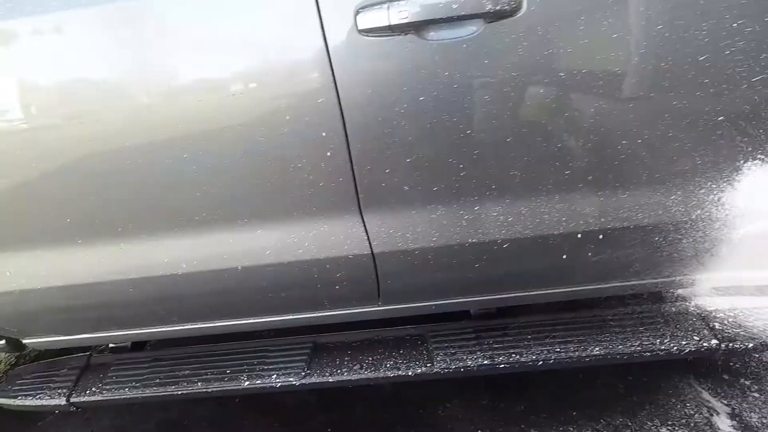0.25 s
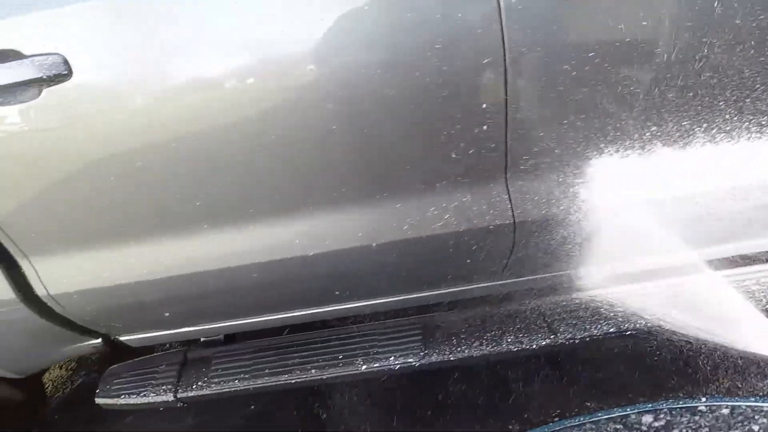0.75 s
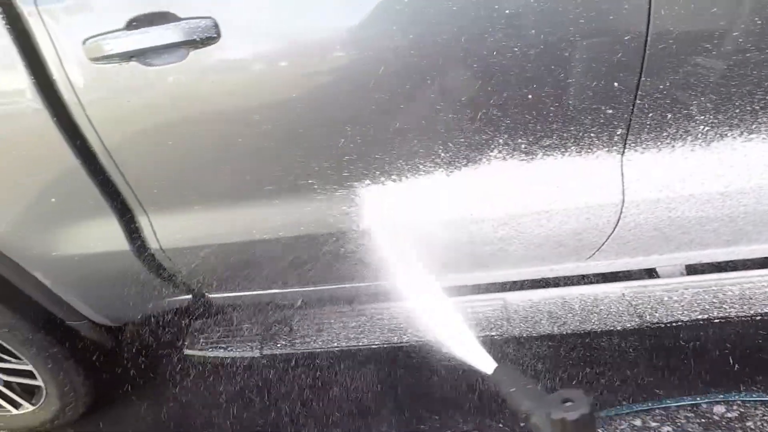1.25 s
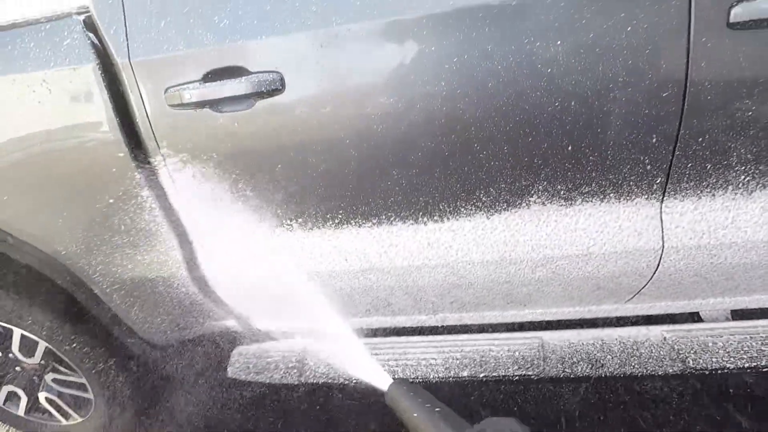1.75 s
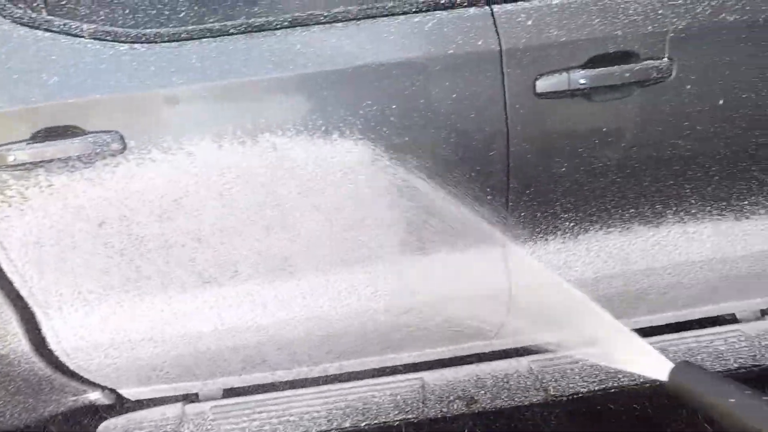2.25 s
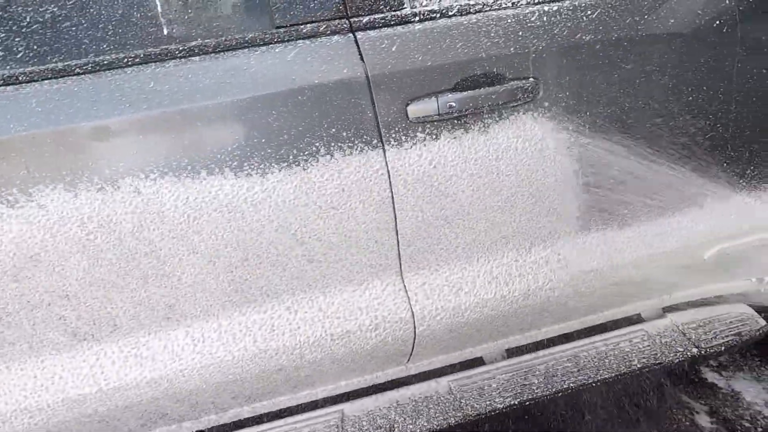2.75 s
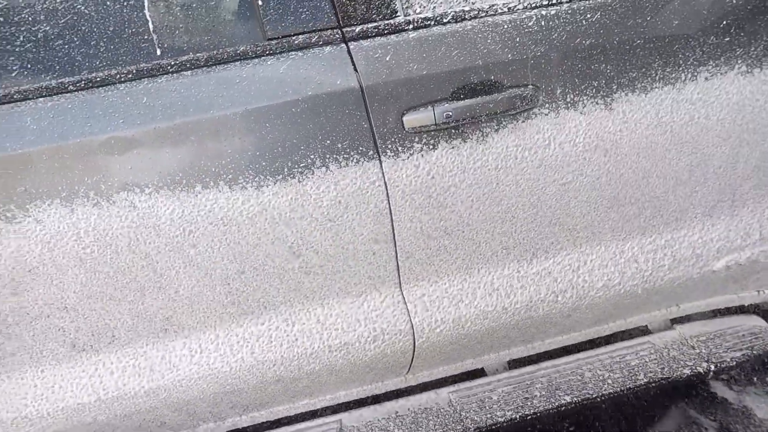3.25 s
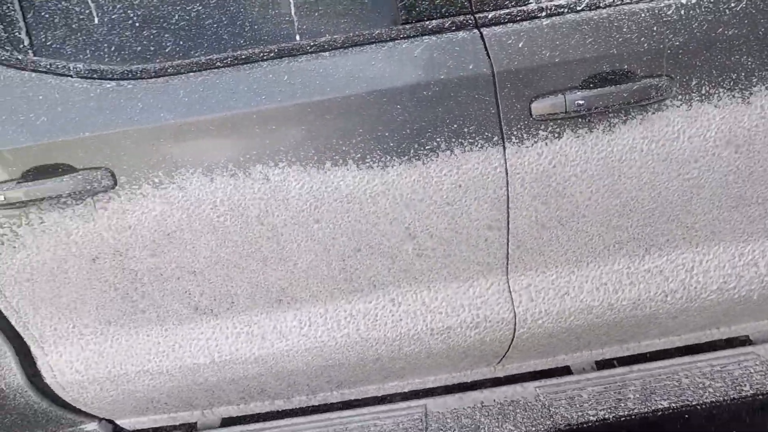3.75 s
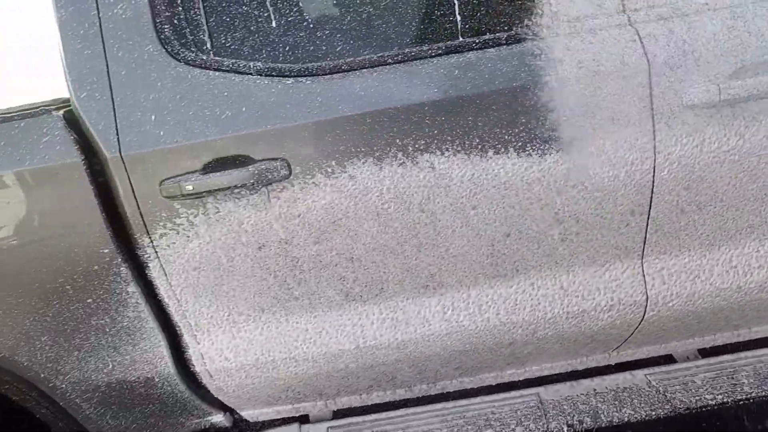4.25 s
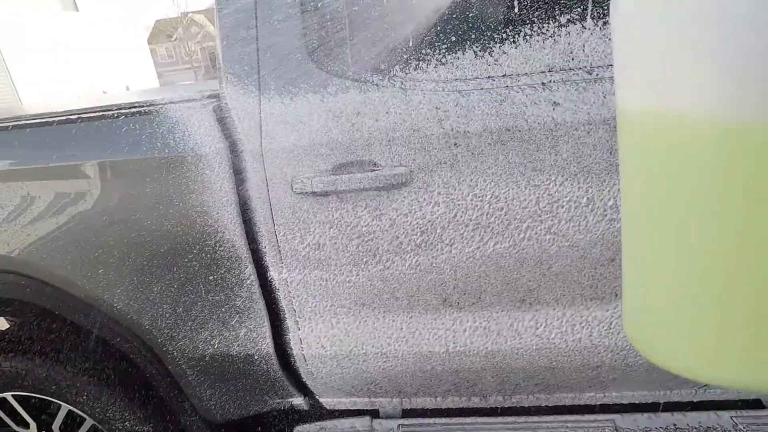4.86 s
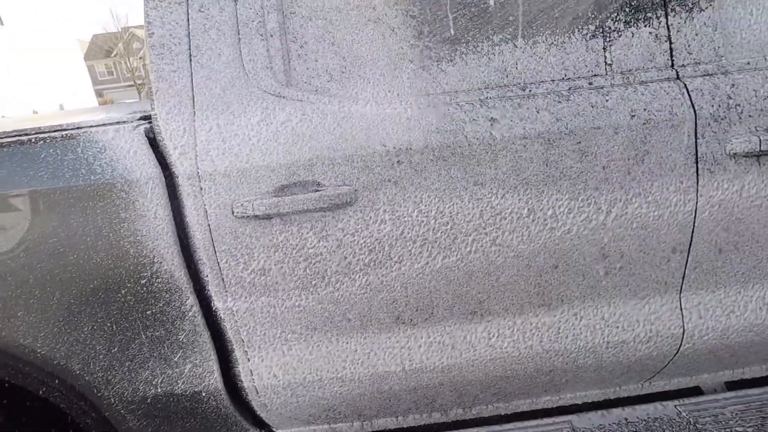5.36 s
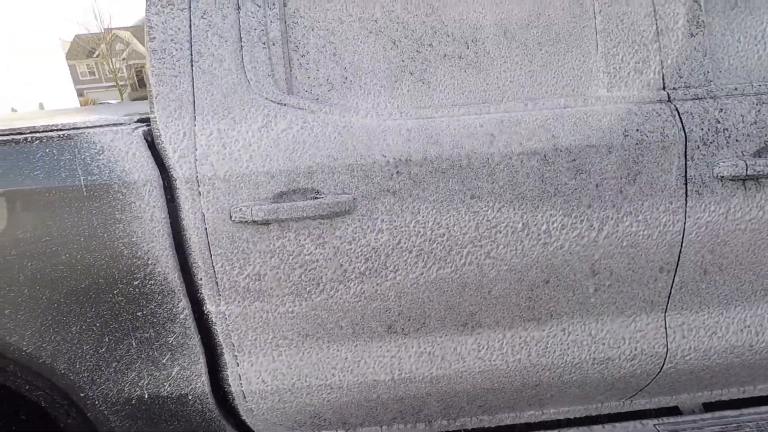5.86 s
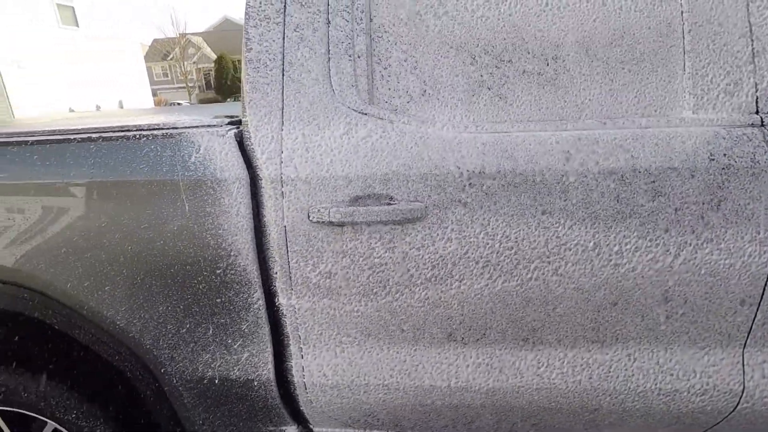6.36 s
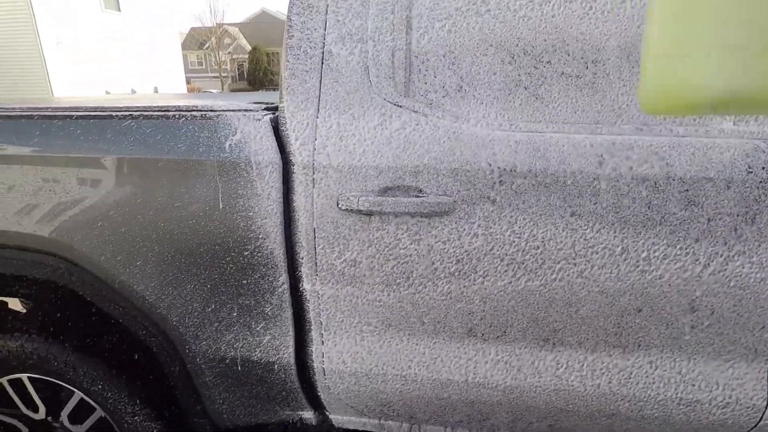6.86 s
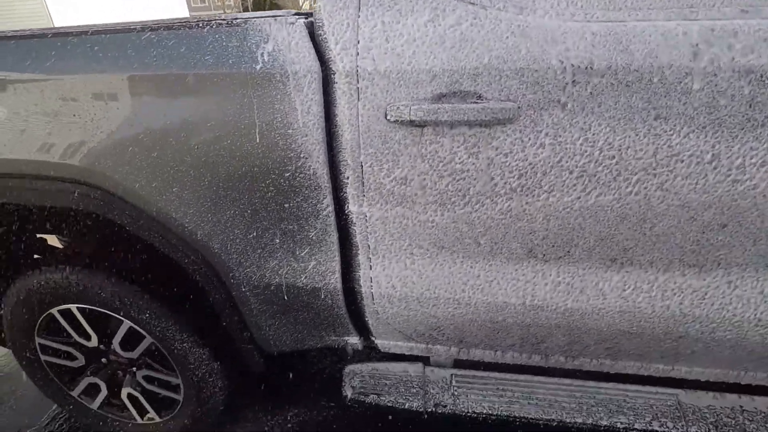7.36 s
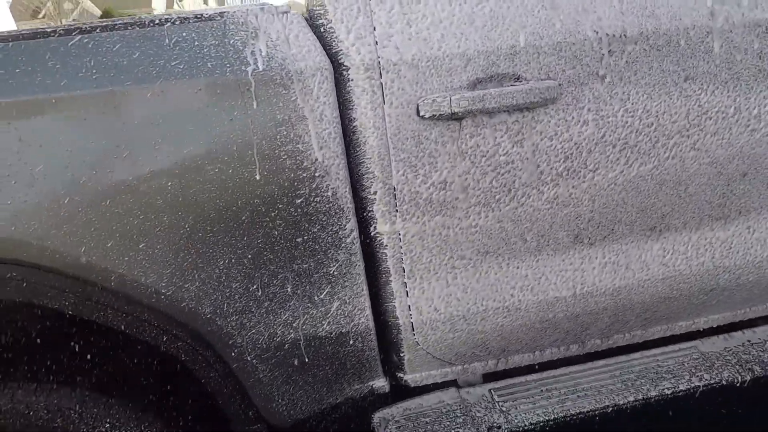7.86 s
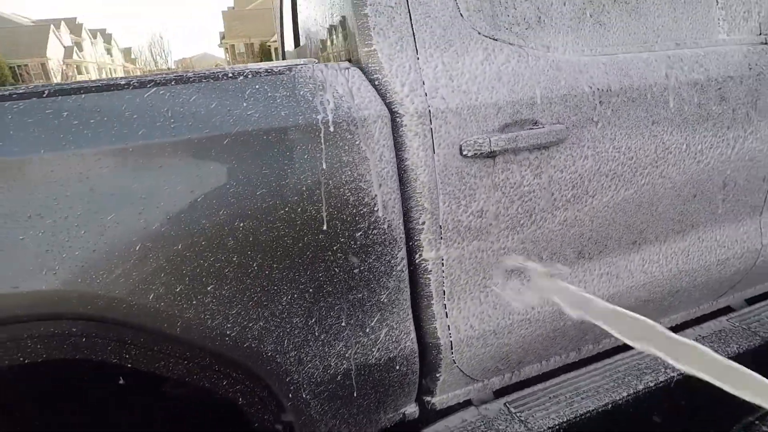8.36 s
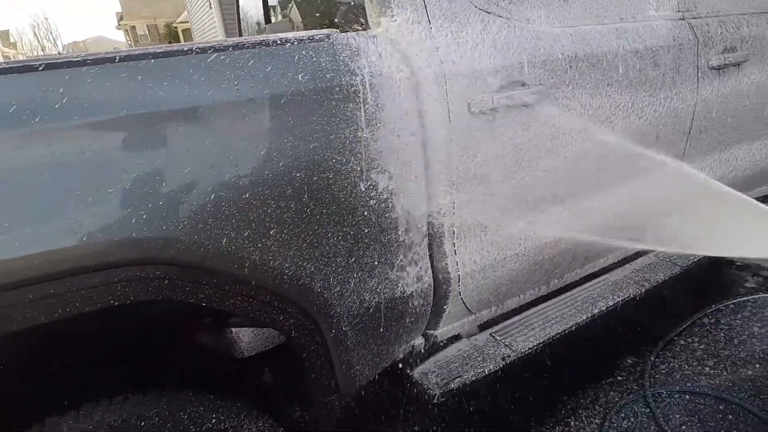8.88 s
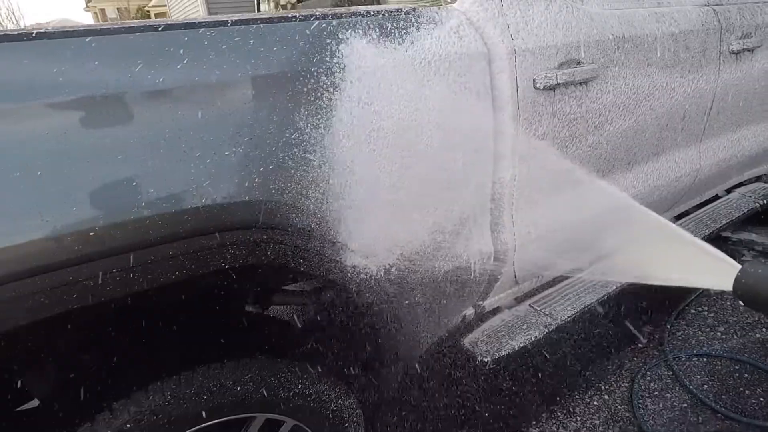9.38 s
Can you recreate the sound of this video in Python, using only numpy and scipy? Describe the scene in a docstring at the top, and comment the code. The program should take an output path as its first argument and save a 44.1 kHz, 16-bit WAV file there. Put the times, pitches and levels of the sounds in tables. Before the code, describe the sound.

Close pressurised spray with a ringing nozzle hiss, trigger clacks and motor run-down, bumps and wind rumble, then the spray bursts back.

```python
"""A foam lance on an electric pressure washer sprays a car door, close to a mono action camera in gusty air.
First a motor whines down; at 0.25 s the jet and the motor under power are on: noise bands, sliding tones.
A low hum of two sines comes and goes, and the sound drops out twice for an instant, near 0.2 and 4.8 s.
At 6.5 s the trigger snaps shut: decaying cracks and knocks over a falling whine, then thumps on the camera.
At 8.3 s the trigger opens again, the motor spins up and the jet returns. Gusts of low noise run throughout."""
import sys
import numpy as np
from scipy import signal
from scipy.fft import rfft, irfft, next_fast_len
from scipy.io import wavfile
from scipy.ndimage import uniform_filter1d, map_coordinates

SR = 44100
rng = np.random.default_rng(int(sys.argv[2]) if len(sys.argv) > 2 else 0)


def unload_wav(signal):
    """Save mono or channel-first audio to the path in sys.argv[1] as 16-bit WAV at rate SR, clipped to [-1, 1]."""
    wavfile.write(
        sys.argv[1],
        SR,
        np.round(np.clip(np.atleast_2d(signal).T, -1, 1) * 32767).astype(np.int16),
    )


N = 424241  # samples
FULL_HZ = 3267  # commutator bar rate at full speed
TOP_HZ = 15400  # upper band limit


def amp(db):
    """Decibels to a linear factor."""
    return 10 ** (np.asarray(db) / 20)


def unit(x):
    """x scaled to rms 1."""
    return x / np.sqrt(np.mean(x ** 2) + 1e-20)


def along(points, hz):
    """Read rows of (Hz, value) at hz, along a log frequency axis."""
    f, values = np.transpose(points)
    return np.interp(np.log(hz + 1), np.log(f + 1), values)


def curves(rows):
    """One value per sample for each column after the time."""
    s, *columns = np.transpose(rows)
    t = np.arange(N) / SR
    return [np.interp(t, s, column) for column in columns]


def spans(tables, fade):
    """A gate that is open inside the tables, with edges of fade seconds, and their columns as curves."""
    t = np.arange(N) / SR
    is_open = sum((t > rows[0][0] - .002) & (t < rows[-1][0] + .014) for rows in tables) > 0
    gate = uniform_filter1d(is_open * 1., max(round(fade * SR), 1))
    return gate, curves(np.vstack(tables))


def wobble(rate):
    """A smooth random curve, rate knots a second."""
    coarse = np.arange(0, N + 32, 32)  # every 32nd sample is enough
    knots = rng.standard_normal(int(N * rate / SR) + 4)
    smooth = map_coordinates(knots, [coarse * rate / SR], mode="nearest")
    return np.interp(np.arange(N), coarse, smooth)


def filtered(x, response):
    """x times a response of frequency."""
    m = next_fast_len(N + SR // 2)
    spectrum = rfft(x, m) * response(np.fft.rfftfreq(m, 1 / SR))
    return irfft(spectrum, m)[..., :N]


def coloured(x, spectrum):
    """x shaped by rows of (Hz, dB), at rms 1."""
    return unit(filtered(x, lambda hz: amp(along(spectrum, hz))))


def rush(spectrum, patchy_db, streaky_db):
    """Coloured noise of rms 1 with short random patches, and streaks as of echoes off car and ground."""
    z = signal.stft(rng.standard_normal(N), nperseg=512)[2]

    def field(bins, frames):
        across = uniform_filter1d(rng.standard_normal(z.shape), bins, 0)
        return unit(uniform_filter1d(across, frames, 1))

    gain = amp(patchy_db * field(6, 14) + streaky_db * field(4, 110))
    noise = signal.istft(z * gain, nperseg=512)[1][:N]
    return coloured(noise, spectrum)


def narrow(hz, width_hz):
    """Noise in a resonance whose centre follows hz; width_hz holds at the highest pitch and shrinks with it."""
    pair = filtered(rng.standard_normal((2, N)), lambda f: 1 / (1 + (2 * f / width_hz) ** 2))
    cycles = np.cumsum(hz)
    a, b = pair[:, np.minimum(cycles / hz.max(), N - 1).astype(int)]
    turn = 2 * np.pi * cycles / SR
    return unit(a * np.cos(turn) + b * np.sin(turn))


def wavering(hz, drift):
    """A tone whose phase (drift in radians) and level drift."""
    turn = 2 * np.pi * np.cumsum(hz) / SR + drift * wobble(12)
    return np.sqrt(2) * amp(2.3 * wobble(5)) * np.sin(turn)


def wind():
    """Slow pressure swings on the microphone port, quicker lumps and a dull roar."""
    # Each row: time in seconds, gust in dB, roar in dB; both are offset in the mix below.
    gusts = [(0, -1, -57), (.7, -1, -42), (1.5, 2.5, -51), (2.2, 0, -57), (3.2, -2.5, -38.5),
             (4.15, -0.5, -38.5), (4.7, 2.5, -61), (5.6, -3, -62), (6.5, -1, -52), (7.5, 3, -37.5),
             (8.4, 4, -47), (8.85, -3, -56), (9.3, 6, -50), (9.62, 1, -45)]
    # Colours of the three layers. Each row: frequency in Hz, relative level in dB.
    buffet_colour = [(1, -39), (4, 5.5), (12, 5.5), (20, -6.5), (30, -49), (45, -73)]
    flutter_colour = [(12, -34), (22, -10.5), (45, 3), (80, -10.5), (160, -28), (300, -35), (500, -120)]
    roar_colour = [(70, -41), (130, -3), (230, 5.5), (330, 5), (500, -42)]
    gust_db, roar_db = curves(gusts)
    colours = (buffet_colour, flutter_colour, roar_colour)
    slow, lumps, roar = [coloured(rng.standard_normal(N), colour) for colour in colours]
    lumpy = amp(3.3 * wobble(12.0))
    out = amp(-14.5 + gust_db) * slow
    out += amp(-42 + 1.26 * gust_db) * lumpy * lumps  # the flutter grows faster than the gust
    return out + amp(roar_db - 5) * lumpy * roar


def hum():
    """A low tone and its octave, swelling now and then."""
    # Each row: start in seconds, end in seconds, first level in dB rms, last level in dB rms,
    # octave in dB over the tone.
    swells = [(2.102, 3.7, -44.5, -45, -15), (3.7, 4.601, -36.5, -38, -9), (5.85, 7.89, -44.5, -40, -2)]
    t = np.arange(N) / SR
    turn = 2 * np.pi * np.cumsum(58.1 + .8 * wobble(3.2)) / SR  # centre and drift in Hz
    out = np.zeros(N)
    for start, end, first_db, last_db, octave_db in swells:
        gate = np.clip(np.minimum(t - start, end - t) / 0.092 + .5, 0, 1)
        level = amp(np.interp(t, [start, end], [first_db, last_db]))
        out += gate * level * (np.sin(turn) + amp(octave_db) * np.sin(2 * turn))
    return np.sqrt(2) * out


def taps():
    """Taps on the camera mount: one low push, then the mount rings."""
    # Each row: start in seconds, ring in dB, thump in dB; each is raised by a fixed amount below.
    mount_taps = [(6.826, -27, -22.5), (7.271, -20, -20.5), (7.91, -14, -27), (7.996, -26, -25),
                  (8.11, -18, -26), (8.199, -42, -32), (8.621, -21, -34), (9.127, -33, -26.5)]
    out, t = np.zeros(N + SR), np.arange(SR // 4) / SR
    push = np.exp(-((t - .004) / 0.0039) ** 2) * -np.cos(2 * np.pi * 90 * (t - .004))
    ring = amp(-60 * t / .16) * (1 - np.exp(-t / 0.0065)) * np.sin(2 * np.pi * 226 * t)
    for s, ring_db, thump_db in mount_taps:
        out[round(s * SR):][:len(t)] += amp(ring_db + 3) * ring + amp(thump_db + 9.5) * push
    return out[:N]


def clicks():
    """Plastic contacts of trigger and grip: a scratchy crack around one pitch and a hollow knock."""
    # Each row: start in seconds, crack in dB (relative), crack pitch in Hz, crack's 60 dB decay in seconds,
    # knock in dB (relative), knock pitch in Hz.
    contacts = [(6.517, 5, 5500, 0.014, -9, 720), (6.522, 7, 4070, 0.027, -4.5, 727),
                (6.566, -22, 3520, .02, -22, 740), (7.08, -29, 1460, .06, -20, 1000),
                (7.142, -19, 7450, 0.036, -50, 894), (7.62, -25, 3320, 0.034, -50, 900),
                (7.67, -26, 7050, 0.051, -47, 900), (7.78, -30, 3070, 0.14, -22, 580),
                (7.879, -29, 4020, 0.27, -21, 1020), (7.909, -28, 6020, 0.056, -21, 990),
                (8.2858, -12, 6000, 0.014, -25, 476), (8.288, -16, 1980, 0.024, -2, 494),
                (8.296, -7, 7090, .015, -25, 501), (8.312, -20, 8900, .012, -21, 503),
                (8.33, -14, 3020, .02, -13, 506), (8.348, -24, 5060, .015, -23, 480),
                (8.408, -9, 5000, .015, -35, 600), (8.413, -4.5, 3500, 0.023, -32, 600),
                (8.42, -4, 3880, 0.026, -30, 600)]
    out, t = np.zeros(N + SR), np.arange(SR // 8) / SR
    for s, crack_db, crack_hz, t60, knock_db, knock_hz in contacts:
        scratch = rng.standard_normal((2, len(t)))
        crack = 1.76 * uniform_filter1d(scratch[0], size=12) * np.sin(2 * np.pi * crack_hz * t)
        crack += 0.17 * uniform_filter1d(scratch[1], size=2)  # bright, unpitched grit
        crack *= amp(crack_db - 60 * t / t60) * (1 - np.exp(-t / t60 / 0.022))
        knock = amp(knock_db - 60 * t / 0.027) * (1 - np.exp(-t / 0.0018))
        knock *= np.sin(2 * np.pi * knock_hz * t)
        out[round(s * SR):][:len(t)] += crack + knock
    return out[:N]


def motion():
    """Bar rate, whine and overtone levels, time since switch-off, gate while coasting, low fan level."""
    # Each row: coasting heard from, to, and the switch-off, all in seconds.
    stops = [(0, .246, -.49), (6.56, 8.287, 6.56)]
    # Low fan noise at each switch-off, in dB.
    fan_low_db = [-42.5, -37.5]
    # One run-down. Each row: seconds after switch-off, bar rate in Hz, whine in dB, overtones in dB over it.
    run_down = [(0, 3281, -50, 12), (.1, 3085, -40, -3), (.17, 2676, -48, -3), (.24, 2233, -40.5, 3),
                (.39, 1961, -43, 3.5), (.47, 1510, -35.5, -7), (.58, 1196, -46.5, 8), (.69, 950, -39, -1),
                (.8, 718, -43.5, 4.5), (.9, 455, -47.5, 11), (.98, 415, -51, 11), (1.2, 250.4, -68, 0)]
    # Each row: time in seconds, whine under power in dB.
    running = [(.25, -42.5), (2, -44.5), (3, -46), (3.6, -39.5), (5, -55), (6.5, -54), (8.4, -38),
               (8.55, -42), (8.7, -47), (9.62, -52)]
    start_s, heard_s, spin_up_s = 8.345, 8.41, .09
    t = np.arange(N) / SR
    since, coasting, low_db = np.zeros((3, N))
    for (first, last, off), db in zip(stops, fan_low_db):
        inside = (t >= first) & (t < last)
        since[inside], coasting[inside], low_db[inside] = t[inside] - off, 1, db
    s, *falling = np.transpose(run_down)
    spin_up_hz = FULL_HZ * (1 - (t > start_s) * np.exp(-np.abs(t - start_s) / spin_up_s))
    silent = (t >= stops[-1][1]) & (t < heard_s)
    powered = [spin_up_hz, curves(running)[0] - 120 * silent, 0.7]  # overtones in dB last
    states = [np.where(coasting, np.interp(since, s, c), p) for c, p in zip(falling, powered)]
    return states, since, coasting, low_db


def motor():
    """Brushes cross the commutator bars: fuzzy lines slide through the case's colour; the pump sings faintly."""
    # Each row: multiple of the bar rate, level in dB relative to the whine.
    bar_orders = [(1, 11), (2, 4.5), (3, -3), (4, -7.5), (5, -13), (6, -8.5), (8, -11)]
    # Colour of the motor case. Each row: frequency in Hz, gain in dB.
    case_colour = [(200, -11), (600, -10), (950, -4.5), (1300, -5.5), (2200, -7), (2900, -10), (3400, -5.5),
                   (4150, 1.5), (5000, 6.5), (6400, 5), (9000, -2.5), (14000, -10)]
    # Pump tones while it delivers. Each row: frequency in Hz, relative level in dB.
    pump_tones = [(296, -48.5), (393, -41), (486, -46), (522, -54), (843, -40.5), (1044, -48),
                  (1113, -39.5)]
    # Fan noise while coasting, low and high. Each row: frequency in Hz, relative level in dB.
    fan_low_colour = [(90, -28), (160, -9), (350, -6), (950, -6), (1600, -9), (3000, -21.5), (6000, -44),
                      (12000, -38)]
    fan_high_colour = [(1470, -28), (2500, -10), (3250, -12), (4210, -9), (4730, -11), (6190, -10),
                       (7730, -13.5), (15700, -38)]
    (bar_hz, whine_db, overtones_db), since, coasting, low_db = motion()
    slack = np.clip((FULL_HZ - 40 - bar_hz) / 150, 0, 1)  # 0 near full speed, 1 well below
    pump = sum(amp(db) * wavering(np.full(N, hz), drift=0.6) for hz, db in pump_tones)
    lines = (1 - slack) * amp(39.0) * pump
    for k, db in bar_orders:
        line_hz = k * bar_hz
        steady = 0
        if k * FULL_HZ < TOP_HZ:
            steady = amp(-2.5 * k) * wavering(line_hz, drift=1.15 * k)
        # off full speed the brushes chatter
        smeared = narrow(line_hz, width_hz=380 * k ** 1.15) * amp(2.5 * wobble(25))
        line = (1 - slack) * steady + slack * smeared
        level = amp(db + (k > 1) * overtones_db + along(case_colour, line_hz))
        lines = lines + level * (line_hz < TOP_HZ) * line
    # the fan noise fades by 4 dB a second low down, 12.5 dB a second high up
    low = amp(low_db - 4 * since + 1.2 * wobble(8))
    low = low * rush(fan_low_colour, patchy_db=1.2, streaky_db=.6)
    high = amp(-35 - 12.5 * since + 1.8 * wobble(25))
    high = high * rush(fan_high_colour, patchy_db=1.8, streaky_db=.8)
    return amp(whine_db) * lines + coasting * (low + high)


def dipped(x):
    """x with a moving dip cut out, where the echo off the door cancels the jet."""
    # Each row: time in seconds, centre in Hz, depth in dB (negative lifts).
    door_dip = [(.25, 1299, -1.5), (1.7, 1240, 3), (3.7, 1290, 6), (4.1, 1150, 9), (4.3, 1000, 13),
                (5.2, 979, 4), (5.5, 1400, 7), (6.4, 1404, 5), (8.5, 1150, 0.5), (9.62, 1298, 3)]
    width_hz = 160
    hz, t, z = signal.stft(x, SR, nperseg=1024)
    s, centre_hz, depth_db = np.transpose(door_dip)
    shape = np.exp(-((hz[:, None] - np.interp(t, s, centre_hz)) / width_hz) ** 2)
    cut = amp(-np.interp(t, s, depth_db) * shape)
    return signal.istft(z * cut, SR, nperseg=1024)[1][:N]


def spray():
    """The jet rings in the nozzle, hisses, and drums on the door: noise bands and a narrow moving resonance."""
    # One table a stretch of spray. Each row: time in seconds, jet level in dB, nozzle ring in Hz,
    # then relative to the jet level: ring in dB, door drumming in dB, treble fizz in dB.
    jet_stretches = [
        [(.25, -28, 2088, 5.5, -8, 5), (.95, -29, 2140, 6.5, -6.5, 9), (1.2, -29, 2068, 6.5, -7.5, 8.5),
         (1.6, -28.5, 2057, 12, -5.5, -2), (1.8, -29.5, 1990, 10.5, -3, 0), (2.15, -26.5, 1913, 7, -5, 5),
         (2.47, -27.5, 1920, 1, -6.5, 8), (2.8, -29.5, 1934, 1, -7, 6.5), (2.92, -30.5, 2083, 6.5, -4.5, 7.5),
         (3.4, -30, 2096, 6, -4.5, 5.5), (3.6, -29, 2080, 7.5, -7, 4), (3.95, -26.5, 2075, 7, -6.5, 1.5),
         (4.18, -28, 2130, 10.5, -0.5, 4), (4.4, -25, 2291, 3, -3, 3), (4.6, -25, 2240, 5, -2, 1.5)],
        [(4.61, -28.5, 2234, 7, -1, 1), (4.73, -31.5, 2214, 8, 1.5, -1)],
        [(4.84, -31.5, 2140, 5.5, -4.5, -0.5), (5.03, -34, 2140, 6, -1, 0.5), (5.41, -33, 2127, 8, 2.5, 6)],
        [(5.43, -37.5, 2135, 5.5, -2, 7.3), (5.9, -33.5, 2074, 2, -2.5, 2.7), (6.12, -32, 2190, -3.5, 0, 4.8),
         (6.3, -28, 2137, -1, -4.5, 4.2), (6.51, -27.5, 2193, -2, -3, 3.6)],
        [(6.535, -33, 2090, -13, -16, 12), (6.56, -35, 2090, -9, -12, 2.7)],
        [(8.295, -38.5, 1867, 12, 11, -9), (8.405, -37, 1907, 7.5, 9, -6)],
        [(8.42, -35, 2045, -14, -11, -14), (8.44, -34.5, 2033, -12, 0, -4), (8.53, -29, 2028, -2, 4.5, -13),
         (8.58, -33, 2007, 3, 8, -6), (8.665, -31, 1980, 12.5, 3.5, -7)],
        [(8.675, -27, 2070, 4.5, -3, 4), (8.94, -26, 2210, 5.5, -2, 4), (9.06, -27, 2104, 2, -1.5, 6),
         (9.62, -28.5, 2115, 6, -6, 5)],
    ]
    # Bands that drift on their own. Each row: time in seconds, patter near 1 kHz in dB and hiss near 6 kHz
    # in dB relative to the jet level, mist in dB over the fizz.
    drifting_bands = [(.25, -7, -1, -0.5), (.9, -5.5, 1.5, -3.5), (1.4, -7, -1, -4),
                      (1.65, -11.5, -2, -9.5), (2.2, -10.5, -4.5, -1.5), (2.85, -6, 1.5, -4),
                      (3.35, -2.5, 6, -1.5), (3.57, 0.5, 6.5, -4), (3.65, -4, 5.5, 3.5), (4, -0.5, 3, -2),
                      (4.25, -6, -0.5, 1), (4.57, -4, -1.5, -4), (5.3, -6, -.5, -7), (5.6, -1, 1.5, -1),
                      (6.5, -4.5, -1.5, -3), (8.3, 7, 0, -19), (8.5, -4, 2.5, -9), (8.68, -5, -2, -10),
                      (9.1, -9, -1, -2.5), (9.62, -9, 0, -3.5)]
    # Colours of the layers. Each row: frequency in Hz, relative level in dB.
    door_colour = [(90, -37), (150, -14), (230, -8), (290, -10), (390, 0), (530, 7.5), (700, 1), (950, -17),
                   (1500, -120)]
    patter_colour = [(450, -67), (700, 3.5), (1000, 3), (1400, -0.5), (1900, -40), (3000, -120)]
    hiss_colour = [(900, -28), (1400, -9.5), (2000, -7.5), (3000, -9.5), (4600, -9), (6500, -17),
                   (9000, -120)]
    high_hiss_colour = [(3500, -13), (5000, -2.5), (6300, 3), (7200, -5), (9000, -45), (12000, -120)]
    fizz_colour = [(4000, -42), (6800, -4), (8440, 1), (10700, -9), (13900, -20), (22000, -120)]
    mist_colour = [(6060, -22), (10300, -8.5), (13600, 0), (14700, -6.5), (15700, -6)]
    on, (jet_db, ring_hz, ring_db, door_db, fizz_db) = spans(jet_stretches, fade=0.0027)
    patter_db, high_db, mist_db = curves(drifting_bands)
    sputter_db = 0.22 * wobble(9) + 0.48 * wobble(60)  # air gulps in the foam shake all layers
    jet = amp(door_db + 1.2 * wobble(6)) * rush(door_colour, patchy_db=0.5, streaky_db=1.5)
    jet += amp(patter_db + 0.5 * wobble(6)) * rush(patter_colour, patchy_db=-0.15, streaky_db=2.5)
    broad_ring = 0.86 * narrow(ring_hz, width_hz=600)
    sharp_ring = .5 * narrow(ring_hz + 60 * wobble(3), width_hz=160)
    jet += amp(ring_db - 1.5 + 1.04 * wobble(13)) * (broad_ring + sharp_ring)
    jet += amp(3) * rush(hiss_colour, patchy_db=0.5, streaky_db=2.0)
    jet += amp(high_db) * rush(high_hiss_colour, patchy_db=1.26, streaky_db=2.6)
    jet += amp(fizz_db) * rush(fizz_colour, patchy_db=.8, streaky_db=.7)
    jet += amp(fizz_db + mist_db) * rush(mist_colour, patchy_db=1.3, streaky_db=2.0)
    return on * amp(jet_db + sputter_db) * dipped(jet)


def scene():
    """All layers summed, the same in both channels."""
    mono = wind() + hum() + taps() + clicks() + motor() + spray()
    return np.tile(mono, (2, 1))


def record(dry):
    """In a dropout the last value sinks to zero and the sound resumes from there; soft overload; band limit."""
    # Each row: start in seconds, end in seconds, settling time in seconds.
    dropouts = [(.2135, .223, .0002), (4.733, 4.837, .045)]
    wet, t = dry.copy(), np.arange(SR // 4) / SR
    for start, end, settle in dropouts:
        a, b = round(start * SR), round(end * SR)
        last_value = dry[:, a - 40:a].mean(axis=1, keepdims=True)
        wet[:, a:b] = last_value * np.exp(-t[:b - a] / settle)
        step = dry[:, b:b + 40].mean(axis=1, keepdims=True) - wet[:, b - 1:b]
        wet[:, b:b + len(t)] -= step * np.exp(-t / 0.033)  # no jump on return
    wet = wet / (1 + np.abs(wet) ** 6) ** (1 / 6)
    return filtered(wet, lambda hz: np.interp(hz, [TOP_HZ - 200, TOP_HZ], [1, 0]))


dry = scene()
out = record(dry)
unload_wav(out)
```